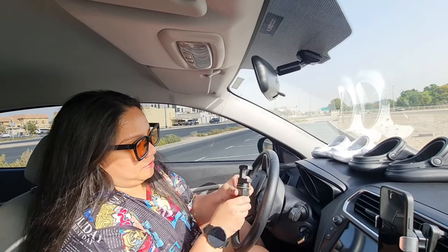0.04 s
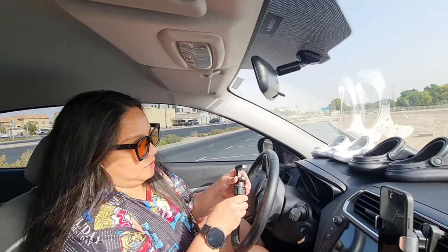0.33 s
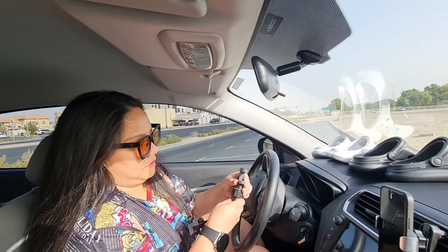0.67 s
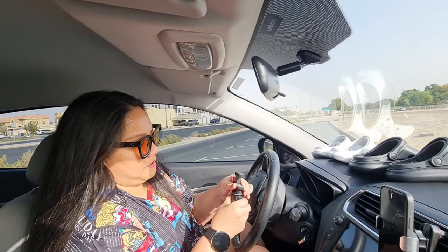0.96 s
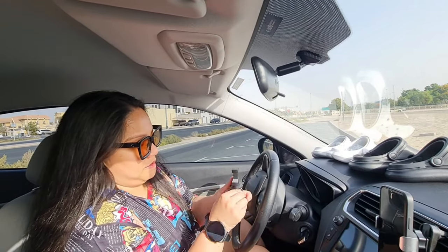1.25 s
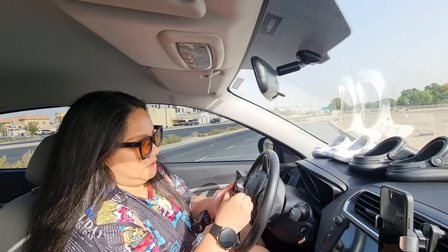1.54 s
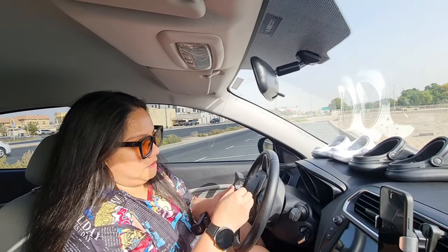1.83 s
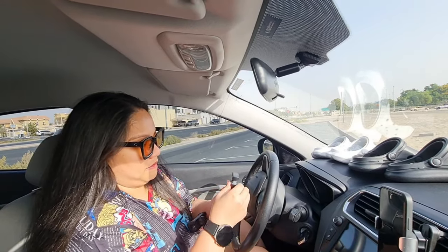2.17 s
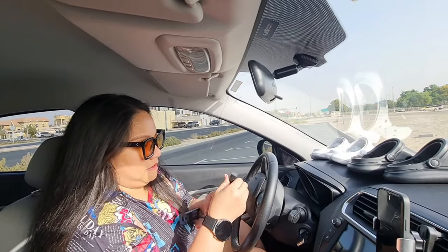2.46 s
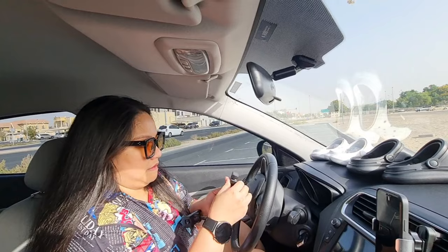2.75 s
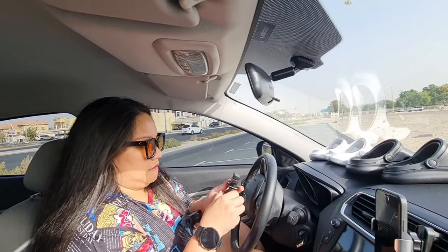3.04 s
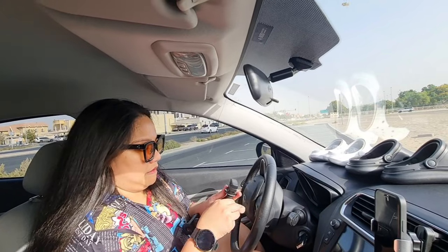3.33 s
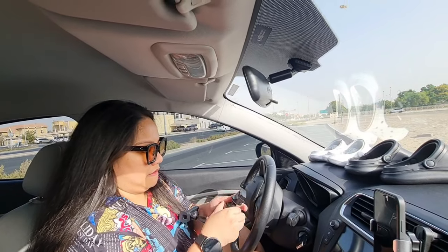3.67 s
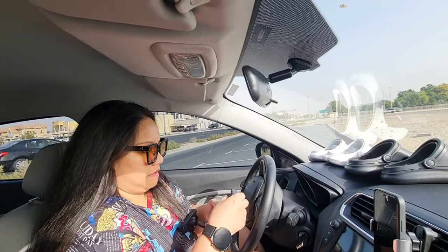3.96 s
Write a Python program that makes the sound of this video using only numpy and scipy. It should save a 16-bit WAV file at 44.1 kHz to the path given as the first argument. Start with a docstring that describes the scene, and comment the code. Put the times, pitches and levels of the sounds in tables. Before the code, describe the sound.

Plastic clicks and taps come irregularly as hands fiddle with a small gadget nearby; a catch snaps early and again past the middle. The microphone is inside a car, with a steady idling engine and faint road noise throughout.

```python
"""Plastic gadget in an idling car

Two hands fiddle with a small hard plastic gadget: its parts tap together, fingers rub over the
shell and a catch snaps twice. Each blow rings the shell; the small cabin adds a very short echo.
Underneath, the four-cylinder engine throbs over a low rumble and faint road noise."""
import sys
import numpy as np
from scipy import signal
from scipy.fft import rfft, irfft
from scipy.io import wavfile

SR = 44100
rng = np.random.default_rng(int(sys.argv[2]) if len(sys.argv) > 2 else 0)


def master(y):
    """Save y as 16-bit WAV."""
    cut = np.clip(np.atleast_2d(y).T, -1, 1)
    pcm = np.round(cut * 32767)  # scale
    wavfile.write(sys.argv[1], SR, pcm.astype(np.int16))


N = 176400

# engine throb: (multiple of the firing rate, level re ENGINE_DB [dB], pan left [dB])
ENGINE_ORDERS = [(1, -2, -7), (2, -18, -0.5), (3, -3.5, -0.5), (5, -4.5, -.5)]
# belt drive and fans: (pitch [Hz], level [dB], pan left [dB])
BELT_FAN_HUMS = [(31.3, -51, -2), (46.1, -43.5, -1), (278, -57, -11), (351.7, -63, 4.5), (369, -55, 7)]
# tone of the rumble and road noise: (frequency [Hz], relative level [dB])
RUMBLE_EQ = [(15, -15), (35, -11), (62, -2), (105, -3.5), (145, -10), (220, -10.5), (330, -14), (430, -20),
             (600, -18.5), (800, -26.5), (1100, -32.5), (1600, -37), (2400, -45.5), (3500, -57.5),
             (5500, -66), (9000, -71), (15500, -70.5)]
# stereo width of the rumble: (frequency [Hz], side over mid [dB])
RUMBLE_WIDTH = [(60, -14), (120, -12), (220, -12), (380, -5), (650, 11), (1300, 4.5), (2400, 1.5),
                (6000, -0.5)]
# light contacts: (time [s], level [dB], body [dB], treble [dB], pitch of the struck part [Hz])
PART_TAPS = [(0.0100, 1.5, -3, -4.5, 2844), (0.4318, -15.5, 7, 0, 3670), (0.4470, -23.5, 5, -0.5, 3780),
             (0.5190, -31, -8, 14, 9700), (0.5930, -10.5, 6.5, -0.5, 3300), (0.857, -41, -6, 8, 5500),
             (0.903, -45, -4, 10, 3500), (1.110, -45, 7, 8, 8500), (1.161, -34.5, 15, -2, 3960),
             (1.181, -17.5, -5, -19, 3840), (1.316, -38.5, 8, 9, 3900), (1.388, -39, 2, -1, 3500),
             (1.525, -27.5, -13, -11, 3730), (1.5410, -23.5, 14, 6.5, 3230), (1.605, -37.5, -4, 6.5, 3600),
             (1.7, -25, -24, -15, 3730), (1.717, -36.5, -9, -2, 3500), (1.924, -38.5, -7, 5, 3500),
             (1.965, -40.5, 2, 5, 7700), (2.277, -47.5, -10, 6, 3540), (2.343, -48.5, -6.5, 0, 3600),
             (2.9320, -16, 0, -26.5, 2910), (3.089, -34.5, -4, -16, 3600), (3.148, -18.5, 0.5, -10.5, 3600),
             (3.1990, -16.5, -20, -22, 4150), (3.340, -40.5, -5, -1, 3200), (3.789, -33, 12, -5.5, 3390)]
# tone of a hard contact: (frequency [Hz], gain [dB])
CONTACT_EQ = [(200, -33.5), (560, -16), (760, -19.5), (1060, -23), (1320, -16), (1580, -14.5), (1950, -3.5),
              (2700, -6), (3500, -5), (4400, -6), (7000, -8.5), (10000, -11.5), (14000, -16.5),
              (16000, -17.5)]
# resonances of the shell: (frequency [Hz], width [Hz], boost [dB])
SHELL_MODES = [(1346, 270, 10.5), (2100, 200, 2.5), (2373, 150, 6), (3260, 130, 5.5), (3590, 31, 0),
               (4010, 100, 8.5), (4960, 40, -4), (5154, 130, 3), (6250, 100, 7.5), (8600, 610, 4),
               (9750, 67, 6.5), (13300, 1200, 7.5)]
# fingers on the shell: (centre time [s], length [s], level [dB], treble [dB])
FINGER_STROKES = [(0.326, 0.053, -73, -1.5), (0.4, 0.034, -77, 1), (0.48, 0.03, -69, -6.5),
                  (0.526, .02, -58, -2.5), (0.573, 0.036, -62, -5), (0.865, 0.018, -68, -3.5),
                  (0.916, 0.06, -69.5, -3), (1.17, 0.19, -67.5, -2.5), (1.401, 0.053, -62.5, 5),
                  (1.557, 0.13, -70, -1.5), (1.73, 0.13, -72.5, 0.5), (1.958, 0.076, -68, -1.5),
                  (2.069, 0.087, -77.5, -0.5), (2.365, 0.073, -73, 1.5), (2.658, 0.066, -74, -2.5),
                  (2.79, 0.051, -83.5, 7), (2.942, 0.058, -69.5, -8), (3.165, 0.088, -63.5, -8.5),
                  (3.599, 0.26, -78, -3.5), (3.938, 0.062, -68, -17)]
# tone of skin on plastic: (frequency [Hz], relative level [dB])
FRICTION_EQ = [(500, -20.5), (1800, -2), (3500, 1.5), (5500, -10), (8800, -5), (11000, -9.5), (14000, -9.5),
               (16000, -9.5)]
# the catch: (time [s], level [dB], body [dB], treble [dB], pitch [Hz], ring [dB], rebound delay [s],
# rebound [dB], slide-in [dB], hollow knock [dB], pan left [dB])
CATCH_SNAPS = [(0.66, 0.5, -9.5, 6, 3650, 9.5, .003, -7.5, -16.5, -41.5, -2.5),
               (2.3990, -1, -0.5, 2.5, 3570, 14, .0036, -15, -5.5, -16.5, -4.5)]
# hollow knock of the casing: (frequency [Hz], relative level [dB], 60 dB decay time [s])
CASING_MODES = [(578, 0.5, 0.023), (733.3, 0.5, 0.025), (1100, -6.5, 0.017), (1325, -5.5, .03)]

FIRING_HZ, ENGINE_DB = 23.85, -35.5
RUMBLE_DB, RUMBLE_PAN_DB = -39.5, -2.5
EARLY_DB, EARLY_T60_S, LATE_DB, LATE_T60_S = 6.5, .024, 3.5, .066
ECHO_BUILD_S, LEFT_LAG_S = .0012, .00022
BODY_HZ, TREBLE_HZ, PART_WIDTH_HZ, TOP_HZ = 2080, 5200, 750, 15800
SLIDE_S, TAP_SLIDE_DB, TAP_RING_DB, HANDS_PAN_DB = .0055, -14.5, 7, -3
RUB_GRAINS_PER_S, RUB_SPREAD_DB, RUB_JERK_DB, RUB_JERK_HZ = 1500, 1, 2.5, 29.94


def undb(db):
    """Decibels to gain."""
    return 10 ** (np.asarray(db) / 20)


def unit(x):
    """Scale to rms 1."""
    return x / np.sqrt(np.mean(x ** 2))


def pan(db):
    """Stereo gains with the left `db` above the right."""
    return undb(np.array([[db], [-db]]) / 2)


def curve(points, hz):
    """An EQ curve in dB, straight between points on a log-frequency axis."""
    freqs, db = np.array(points, float).T
    return np.interp(np.log(hz + 1), np.log(freqs), db)


def drift(rate_hz):
    """Smooth random modulation with rms 1."""
    rolloff = np.exp(-(np.fft.rfftfreq(N, 1 / SR) / rate_hz) ** 2)
    return unit(irfft(rfft(rng.standard_normal(N)) * rolloff, N))


def add(out, start_s, sound):
    """Mix a sound in, trimming what falls outside the scene."""
    i = int(start_s * SR)
    sound, i = sound[:, max(-i, 0):], max(i, 0)
    out[:, i:i + sound.shape[1]] += sound[:, :N - i]


def engine():
    """The firing throbs at a slightly wandering idle speed while belts and fans hum."""
    firings = np.cumsum(FIRING_HZ * (1 + .0014 * drift(4.5))) / SR
    out = np.zeros((2, N))
    for order, db, pan_db in ENGINE_ORDERS:
        gain = pan(pan_db) * undb(ENGINE_DB + db + .3 * drift(11))
        out += gain * np.sin(2 * np.pi * (order * firings + rng.random()))
    for hz, db, pan_db in BELT_FAN_HUMS:
        cycles = np.cumsum(hz * (1 + .0015 * drift(4.9))) / SR + rng.random()
        out += pan(pan_db) * undb(db + 1.8 * drift(3.1)) * np.sin(2 * np.pi * cycles)
    return np.sqrt(2) * out


def rumble():
    """Dull body rumble and road noise, narrow in the bass and wide above."""
    hz = np.fft.rfftfreq(N, 1 / SR)
    width = undb(curve(RUMBLE_WIDTH, hz))
    mid, side = rfft(rng.standard_normal((2, N))) * undb(curve(RUMBLE_EQ, hz)) / np.hypot(1, width)
    bed = irfft(np.array([mid + width * side, mid - width * side]), N)
    return unit(bed) * undb(RUMBLE_DB + .4 * drift(2)) * pan(RUMBLE_PAN_DB)


def contact_force(slide_db, size=2048):
    """A short swelling scrape leads into the blow, which lands at the centre."""
    slide = rng.standard_normal(size) * np.exp((np.arange(size) - size) / SR / SLIDE_S)
    return np.concatenate([undb(slide_db) * slide / np.linalg.norm(slide), signal.unit_impulse(size)])


def shell_crack(body_db, treble_db, part_hz, ring_db, size=4096):
    """A hard contact cracks and briefly rings the struck part and the shell."""
    hz = np.fft.rfftfreq(size, 1 / SR)
    low_shelf = body_db / (1 + (hz / BODY_HZ) ** 4)
    high_shelf = treble_db * (1 - 1 / (1 + (hz / TREBLE_HZ) ** 4))
    db = curve(CONTACT_EQ, hz) + low_shelf + high_shelf
    for mode_hz, width, boost in list(SHELL_MODES) + [(part_hz, PART_WIDTH_HZ, ring_db)]:
        db += boost / (1 + (2 * (hz - mode_hz) / width) ** 2)
    # minimum phase: sharp attack first, ring after
    cepstrum = irfft(np.log(undb(db)))
    cepstrum[1:size // 2] *= 2
    cepstrum[size // 2 + 1:] = 0
    return irfft(np.exp(rfft(cepstrum)))


def in_cabin(sound, size=4096):
    """Mono to stereo: direct sound, close reflections off glass and dashboard, a short tail."""
    t = np.arange(size) / SR
    build = 1 - np.exp(-t / ECHO_BUILD_S)
    paths = np.zeros((2, size))
    for db, t60 in ((EARLY_DB, EARLY_T60_S), (LATE_DB, LATE_T60_S)):
        echoes = rng.standard_normal((2, size)) * np.exp(-np.log(1000) * t / t60) * build
        paths += undb(db) * echoes / np.linalg.norm(echoes, axis=1, keepdims=True)
    paths[0, int(LEFT_LAG_S * SR)] += 1
    paths[1, 0] += 1
    return signal.fftconvolve(sound[None], paths, axes=1)


def taps():
    """Parts of the gadget graze and knock together."""
    out = np.zeros((2, N))
    for time, db, body_db, treble_db, hz in PART_TAPS:
        force = contact_force(TAP_SLIDE_DB)
        tap = signal.fftconvolve(force, shell_crack(body_db, treble_db, hz, TAP_RING_DB))
        add(out, time - len(force) / 2 / SR, undb(db) * in_cabin(tap))
    return out * pan(HANDS_PAN_DB)


def rubbing():
    """Skin slips jerkily over plastic in tiny grains; each stroke swells and fades, bright or dull."""
    t = np.arange(N) / SR
    grains = (rng.random(N) < RUB_GRAINS_PER_S / SR) * rng.standard_normal(N)
    grains *= undb(RUB_SPREAD_DB * np.minimum(rng.exponential(size=N), 4))
    tone = undb(curve(FRICTION_EQ, np.fft.rfftfreq(N, 1 / SR)))
    scrape = unit(irfft(rfft(grains) * tone, N)) * undb(RUB_JERK_DB * drift(RUB_JERK_HZ))
    dull = signal.sosfiltfilt(signal.butter(3, TREBLE_HZ, fs=SR, output="sos"), scrape)
    strokes = np.zeros(N)
    for centre, length, db, treble_db in FINGER_STROKES:
        swell = np.exp(-2 * ((t - centre) / length) ** 2)
        strokes += undb(db) * swell * (dull + undb(treble_db) * (scrape - dull))
    return in_cabin(strokes)[:, :N] / 2 * pan(HANDS_PAN_DB)


def casing_knock(size=4096):
    """The hollow casing answers a hard blow with a few low, quickly damped modes."""
    t = np.arange(size) / SR
    ring = sum(undb(db) * np.cos(2 * np.pi * hz * t) * np.exp(-np.log(1000) * t / t60)
               for hz, db, t60 in CASING_MODES)
    return ring / np.linalg.norm(ring)


def snaps():
    """The catch scrapes up its ramp, snaps home and rebounds; the casing's knock takes its own paths."""
    out = np.zeros((2, N))
    for (time, db, body_db, treble_db, hz, ring_db,
         rebound_s, rebound_db, slide_db, knock_db, pan_db) in CATCH_SNAPS:
        force = contact_force(slide_db)
        force[len(force) // 2 + int(rebound_s * SR)] += undb(rebound_db)
        crack = in_cabin(signal.fftconvolve(force, shell_crack(body_db, treble_db, hz, ring_db)))
        hollow = undb(knock_db) * in_cabin(signal.fftconvolve(force, casing_knock()))
        add(out, time - len(force) / 2 / SR, undb(db) * pan(pan_db) * (crack + hollow))
    return out


def scene():
    """The idling car is the bed, with the handled gadget on top."""
    return engine() + rumble() + rubbing() + snaps() + taps()


def record(dry):
    """A steep low-pass shaves off the very top."""
    return signal.sosfilt(signal.ellip(10, .2, 80, TOP_HZ, fs=SR, output="sos"), dry)


dry = scene()
out = record(dry)
master(out)
```